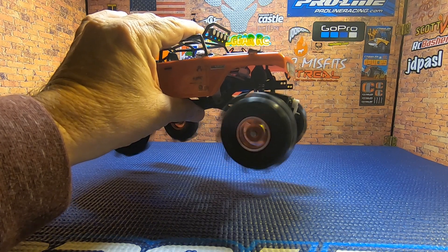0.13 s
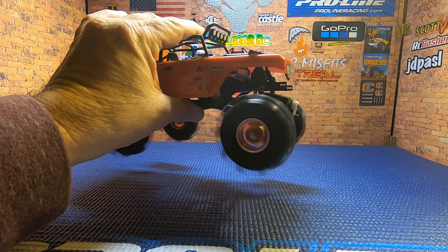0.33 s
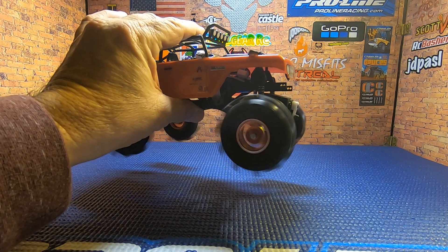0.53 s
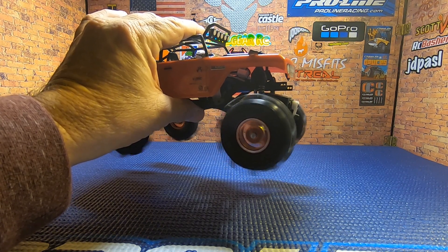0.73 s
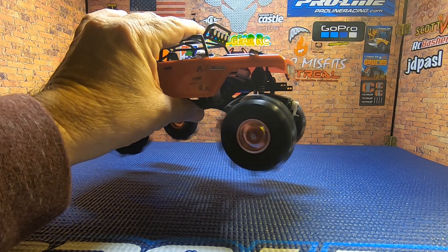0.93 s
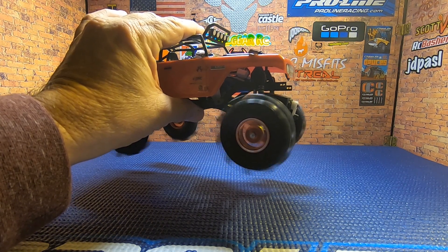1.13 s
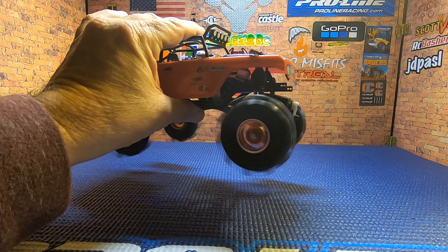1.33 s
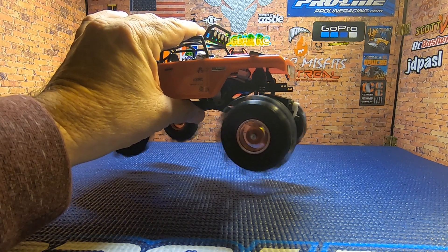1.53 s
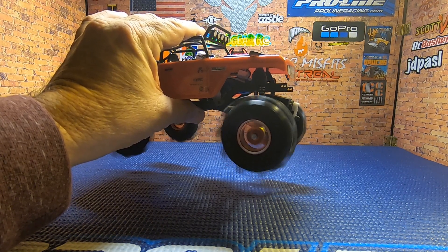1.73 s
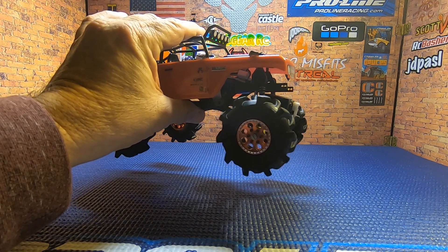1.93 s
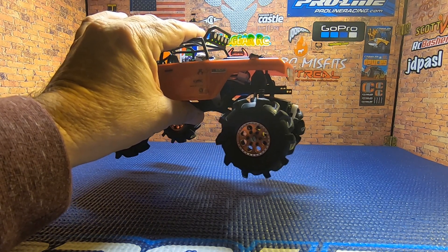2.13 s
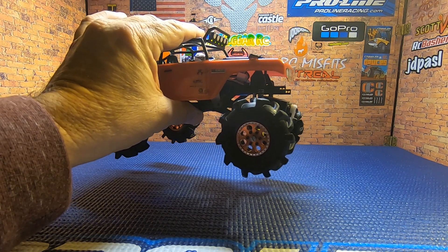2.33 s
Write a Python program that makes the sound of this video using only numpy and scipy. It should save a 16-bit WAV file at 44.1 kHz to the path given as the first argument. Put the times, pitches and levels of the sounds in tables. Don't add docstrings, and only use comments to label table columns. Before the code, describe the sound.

Loud, raspy high gear whir of a small electric toy truck, cut off with a short falling squeal

```python
import sys
import numpy as np
from scipy import signal
from scipy.fft import rfft, irfft, next_fast_len
from scipy.io import wavfile

SR = 44100
rng = np.random.default_rng(int(sys.argv[2]) if len(sys.argv) > 2 else 0)


def unload_wav(signal):
    wavfile.write(
        sys.argv[1],
        SR,
        np.round(np.clip(np.atleast_2d(signal).T, -1, 1) * 32767).astype(np.int16),
    )


def nominal_scale(level):
    x = np.asarray(level, float) / 20
    return 10 ** x


N = 104472
TIME = np.arange(N) / SR
PADDED = next_fast_len(N + SR // 4)
HZ = np.maximum(np.arange(PADDED // 2 + 1) * SR / PADDED, 1)
MESH_HZ, SHAFT_HZ = 959.6, 100.5
SPEED_FADE = 4.9

# (frequency [Hz], shared part [share])
DRIVE_LIKENESS = [(300, 0.85), (800, 0.86), (1400, 0.71), (3000, 0.75), (4600, 0.96), (6700, 0.77),
                  (9500, 0.33), (14000, 0.422)]


def rms_one(x):
    return x / np.sqrt(np.mean(x ** 2) + 1e-20)


def at_hz(points, hz):
    table = np.array(points)
    return np.interp(np.log(hz), np.log(table[:, 0]), table[:, 1])


def drift(rate):
    r = np.exp(-2 * np.pi * rate / SR)
    wander = signal.lfilter([1], [1, -2 * r, r * r], rng.standard_normal(N + SR // 4))
    return rms_one(wander[SR // 4:])


def bump(s, length):
    return np.exp(-.5 * ((TIME - s) / length) ** 2)


def resonance(hz, centre_hz, width, lift_db):
    return 1 + (nominal_scale(lift_db) - 1) / (1 + 2j * (hz - centre_hz) / width)


def to_ports(spectra, likeness, placed=True):
    # (frequency [Hz], level [dB])
    lean = [(60, -2.5), (150, -2.5), (380, -3.5), (940, -3), (2360, -1.0), (5910, -3.5), (14800, 1.5)]
    # (frequency [Hz], phase [radians])
    lead = [(300, .05), (1550, .5), (2000, -.4), (4050, .35), (5750, -.6), (7000, .1), (8650, -2.3),
            (12000, -1.2)]
    shared, left, right = spectra
    alike = np.clip(at_hz(likeness, HZ), 0, 1)
    common = np.sqrt(alike) * shared
    own = np.sqrt(1 - alike)
    turn = nominal_scale(at_hz(lean, HZ) / 2) * np.exp(.5j * at_hz(lead, HZ) * placed)
    ports = [(common + own * left) * turn, (common + own * right) / turn]
    return irfft(ports, PADDED)[:, :N]


def tooth_blows(mesh):
    jitter_s = 3e-5
    tooth = np.floor(mesh + jitter_s * MESH_HZ * drift(900))
    strikes = np.diff(tooth, prepend=0) > 0
    return nominal_scale(-6) * rms_one(strikes * rng.standard_normal((3, N)))


def rattle():
    knocks_per_s, spread_db, hiss_db = 8000, 1.6, -2.5
    sizes = nominal_scale(spread_db * np.minimum(rng.exponential(1, (3, N)), 4.0))
    sizes = sizes * rng.choice([-1, 1], (3, N))
    knocks = sizes * (rng.random((3, N)) < knocks_per_s / SR)
    return rms_one(knocks) + nominal_scale(hiss_db) * rng.standard_normal((3, N))


def shaft_throb(mesh, shaft):
    shaft_beat = np.cos(4 * np.pi * shaft) + np.cos(2 * np.pi * shaft)
    pinion_beat = np.cos(np.pi * mesh / 2)
    return nominal_scale(1.1 * shaft_beat + .7 * pinion_beat + 1.1 * drift(87) + .1 * drift(13))


def gearbox(hz):
    # (frequency [Hz], density [dB per Hz])
    box_colour = [(150, -65), (300, -24.5), (1350, -17.5), (2500, -10), (4000, -14), (6500, -4),
                  (11000, -24.5), (14500, -37)]
    # (frequency [Hz], width [Hz], lift [dB])
    shell_modes = [(796, 81, 7), (2500, 250, 1.5), (3945, 180, 4.5), (5314, 790, 5), (5725, 45, 3.5),
                   (6520, 110, -0.5), (6650, 157, 6.5), (6926, 59, 3), (7950, 120, 4.5), (8610, 193, 11.5),
                   (8880, 81, 6.5), (9850, 200, 6.5), (10330, 280, 8.5), (13840, 860, 10)]
    # (frequency [Hz], width [Hz], lift [dB])
    hand_shadows = [(5910, 120, -4), (1343, 130, -5.5), (7480, 130, -3.5), (5980, 200, -3), (8610, 250, -3),
                    (9350, 330, 2), (12850, 350, -2), (14650, 400, -9.5)]
    out = nominal_scale(at_hz(box_colour, hz)) + 0j
    for mode in shell_modes + hand_shadows:
        out *= resonance(hz, *mode)
    return out


def driven_gears(forces):
    octave = np.log2(np.clip(HZ / 1400, 1, 8))
    parts = 0
    for k in range(7):
        share = np.cos(np.pi * np.clip(octave - k / 2, -.5, .5))
        flutter = nominal_scale(1.5 * drift(81))
        parts = parts + share * rfft(forces[k % 2] * flutter, PADDED)
    ringing = to_ports(parts * gearbox(HZ), DRIVE_LIKENESS)
    return nominal_scale(-22.5) * ringing / np.std(ringing[:, :SR])


def braking_gears(force):
    # (frequency [Hz], density [dB per Hz])
    brake_colour = [(300, -25.5), (1000, -17.5), (1600, -13.5), (2400, -14), (3900, -5), (6500, -8.5),
                    (10100, -10.5), (14500, -39.5)]
    # (frequency [Hz], width [Hz], lift [dB])
    brake_modes = [(845, 180, 6), (3980, 210, 3.5), (6430, 250, 3)]
    colour = nominal_scale(at_hz(brake_colour, HZ))
    colour = colour * np.prod([resonance(HZ, *mode) for mode in brake_modes], axis=0)
    colour = colour / np.sqrt(np.mean(abs(colour) ** 2))
    return nominal_scale(-25.5) * to_ports(rfft(force, PADDED) * colour, DRIVE_LIKENESS)


def gears(effort, speed, mesh, shaft):
    blows = tooth_blows(mesh)
    throb = effort * shaft_throb(mesh, shaft)
    loose = [rattle(), rattle()]
    driven = np.clip(speed ** SPEED_FADE, 0, 1)
    forces = [(x + blows) * throb * np.sqrt(driven) for x in loose]
    return driven_gears(forces) + braking_gears(loose[0] * throb * np.sqrt(1 - driven))


def whine_and_hum(mesh, shaft):
    # (multiple [of tooth rate], level [dB])
    whine_partials = [(1, -60), (3, -48), (4, -55), (6, -45), (7, -39), (9, -48), (10, -55)]
    # (multiple [of shaft rate], level [dB])
    hum_partials = [(1, -60), (2, -59), (3, -56), (4, -65), (8, -53), (12, -57)]
    beat = 282 * mesh / MESH_HZ
    rows = [(k * mesh, db) for k, db in whine_partials]
    rows += [(k * shaft, db) for k, db in hum_partials]
    rows += [(k * mesh - beat, db - 2.5) for k, db in whine_partials[3:5]]
    out = 0
    for turns, db in rows:
        out = out + nominal_scale(db + 4.2 * drift(16)) * np.sin(2 * np.pi * turns + .6 * drift(12))
    return out


def brake_squeal():
    # (time [s], pitch [Hz], level [dB])
    squeal_path = [
        (1.84, 5300, -60),
        (1.858, 5300, -31),
        (1.882, 5250, -31),
        (1.896, 4600, -34),
        (1.907, 3750, -29),
        (1.914, 3650, -37),
        (1.93, 3500, -70),
    ]
    s, pitch_hz, level_db = np.transpose(squeal_path)
    hz = np.interp(TIME, s, pitch_hz)
    db = np.interp(TIME, s, level_db)
    phase = 2 * np.pi * np.cumsum(hz) / SR + 1.3 * drift(150)
    return nominal_scale(db + 3.0 * drift(90)) * np.sin(phase) * (db > -59)


def tones(effort, mesh, shaft):
    out = effort * whine_and_hum(mesh, shaft) + brake_squeal()
    return to_ports(np.sqrt(2) * rfft(out, PADDED) * [[1], [.8], [-.8]], DRIVE_LIKENESS)


def room(x):
    t60_s, level_db, wall_hz = 0.37, -15.5, 5500
    t = np.arange(int(.6 * SR)) / SR
    tail = rng.standard_normal((2, len(t))) * nominal_scale(-60 * t / t60_s) * (t > .008)
    tail = signal.sosfilt(signal.butter(1, wall_hz, fs=SR, output="sos"), tail)
    tail = tail / np.sqrt(np.sum(tail ** 2) / 2)
    return nominal_scale(level_db) * signal.fftconvolve(x, tail, axes=1)[:, :N]


def rumble():
    # (frequency [Hz], density [dB per Hz])
    rumble_colour = [(25, -15), (58, -3.5), (110, -5), (250, -4), (330, -17), (1500, -17.5), (3500, -31),
                     (7000, -54.5)]
    # (frequency [Hz], shared part [share])
    rumble_alike = [(60, 0.95), (290, 1), (600, 0.16), (8000, 0.12)]
    spectra = rfft(rng.standard_normal((3, N)), PADDED) * nominal_scale(at_hz(rumble_colour, HZ))
    noise = to_ports(spectra, rumble_alike, placed=False)
    return nominal_scale(-49.5 + 1.5 * drift(7.5)) * rms_one(noise)


def scene():
    # (time [s], speed [share of full throttle], effort [dB])
    drive_path = [
        (0, 1, 2.6),
        (1.86, 1, 3.6),
        (1.885, .93, -9),
        (1.91, 0.59, -6.5),
        (1.94, .55, -8.5),
        (1.98, 0.31, -15.5),
        (2.034, 0.16, -17.5),
        (2.042, .1, -35),
        (2.07, 0.03, -64),
    ]
    # (time [s], lift [dB], length [s])
    gear_knocks = [
        (1.906, 3, .005),
        (1.955, 2.5, .007),
        (1.993, 6.5, .004),
        (2.026, 1.5, .005),
        (2.146, 3, .003),
    ]
    s, speed, db = np.transpose(drive_path)
    speed = np.interp(TIME, s, speed / speed.max())
    lifts = sum(lift_db * bump(at, length) for at, lift_db, length in gear_knocks[:4])
    effort = nominal_scale(np.interp(TIME, s, db) + lifts)
    last_s, last_db, last_length = gear_knocks[4]
    effort += nominal_scale(-46 + last_db) * bump(last_s, last_length)
    effort += nominal_scale(-38) * bump(2.368 + .001, .001)
    mesh = np.cumsum(MESH_HZ * speed * (1 + .0013 * drift(12))) / SR
    shaft = np.cumsum(SHAFT_HZ * speed * (1 + .003 * drift(6.4))) / SR
    drive = gears(effort, speed, mesh, shaft) + tones(effort * speed ** SPEED_FADE, mesh, shaft)
    return drive + room(drive) + rumble()


def roll_off(x):
    return signal.sosfilt(signal.butter(12, 15400, fs=SR, output="sos"), x)


def record(dry):
    overload = 0.49
    return roll_off(overload * np.tanh(dry / overload))


dry = scene()
out = record(dry)
unload_wav(out)
```